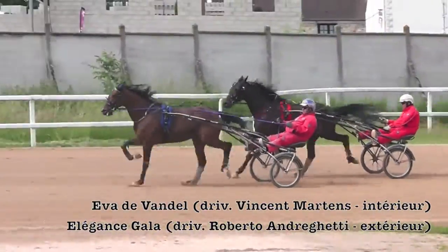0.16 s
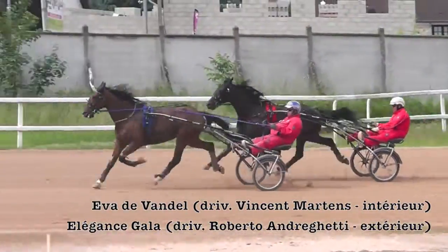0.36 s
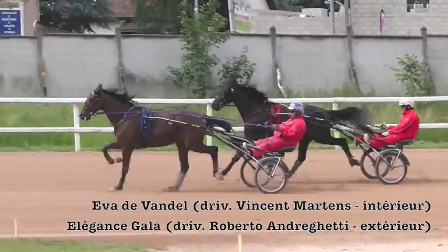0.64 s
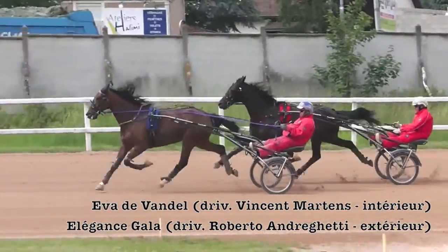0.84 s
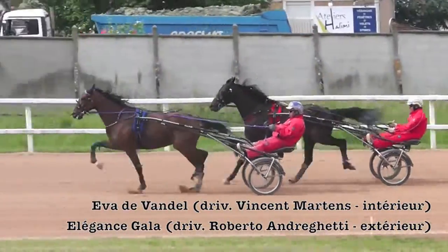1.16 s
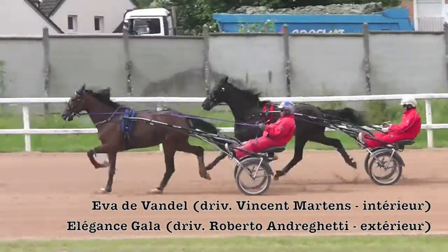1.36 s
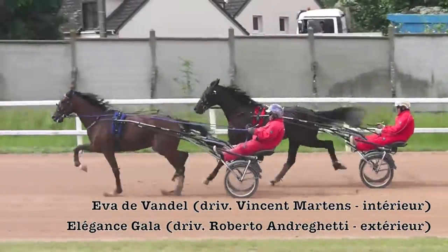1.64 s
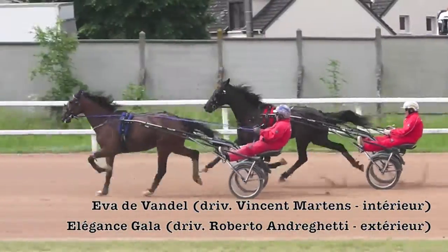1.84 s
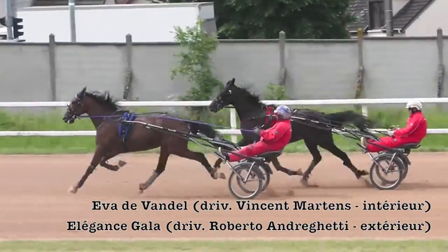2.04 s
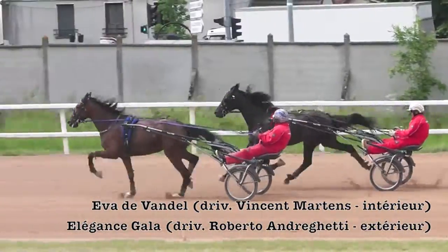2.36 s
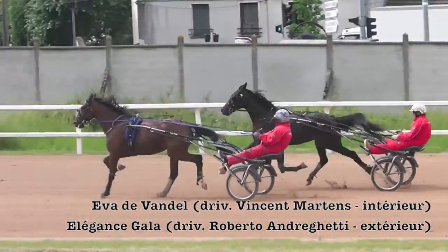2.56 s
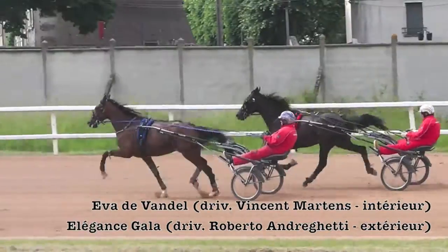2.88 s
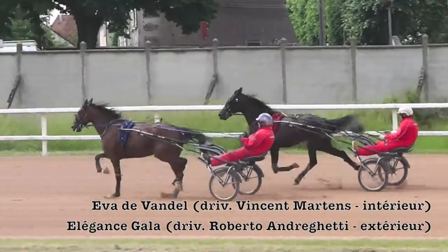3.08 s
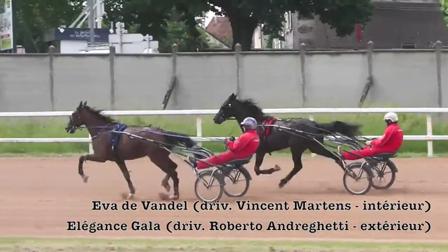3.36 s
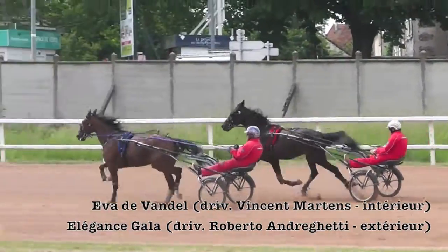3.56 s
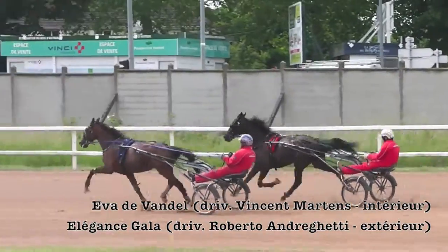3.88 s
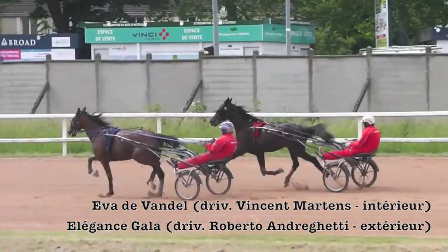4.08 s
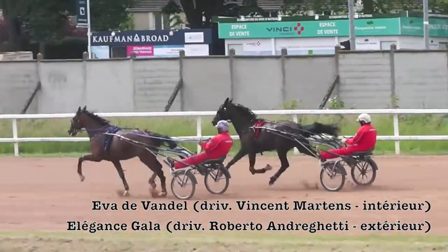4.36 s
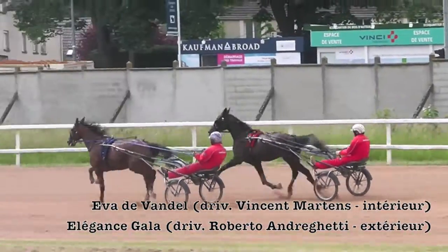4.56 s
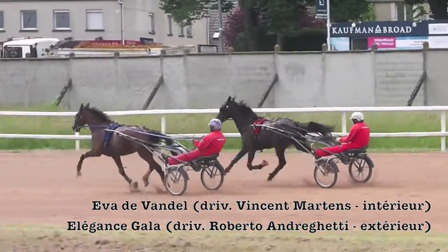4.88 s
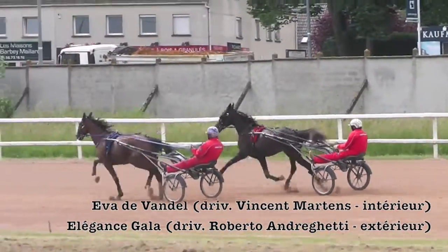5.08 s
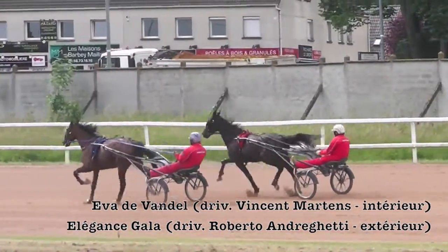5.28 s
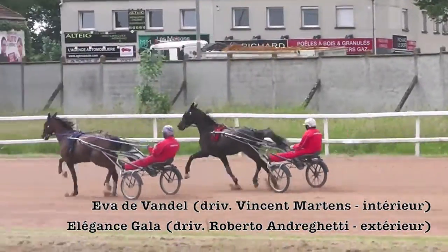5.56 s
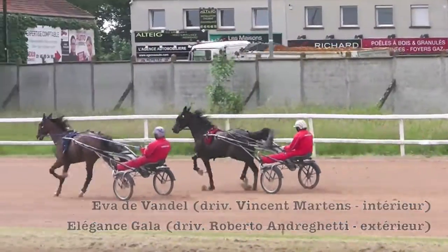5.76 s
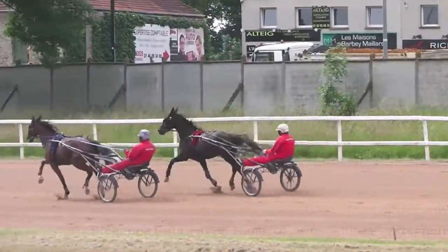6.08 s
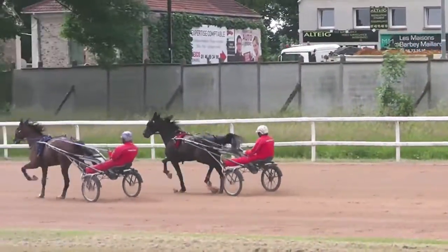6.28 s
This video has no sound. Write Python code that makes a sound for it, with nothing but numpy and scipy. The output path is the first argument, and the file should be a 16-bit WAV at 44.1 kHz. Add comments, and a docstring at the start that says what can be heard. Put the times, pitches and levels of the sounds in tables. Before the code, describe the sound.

Rapid thudding hooves on a sandy track with strap snaps and faint buckle clinks, low road roar behind, gusty microphone wind that finally drops.

```python
"""Two horses trot past on a sand track pulling light carts, then draw away: each hoof is a brief low swing
with a knock, a slap and a spray of sand made of shaped noise. Harness straps snap and grit ticks as bright
noise bursts, buckles tinkle as short wavering tones and cart wheels hiss. Traffic roars behind a wall as
patchy noise, two engines rev up in it as stacked sines, and low noise gusts buffet the microphone ports
until the wind drops."""
import sys
import numpy as np
from scipy import signal
from scipy.fft import rfft, irfft, next_fast_len
from scipy.io import wavfile
from scipy.ndimage import uniform_filter1d, map_coordinates

SR = 44100
rng = np.random.default_rng(int(sys.argv[2]) if len(sys.argv) > 2 else 0)


def dump_mix(stems):
    """Bounce the given channels to the path in sys.argv[1] as a 16-bit WAV at rate SR."""
    frames = np.atleast_2d(stems).T  # one column per channel
    limited = np.clip(frames, -1, 1)  # hard clip at full scale
    pcm = np.round(limited * 32767).astype(np.int16)
    wavfile.write(sys.argv[1], SR, pcm)


N = 283102

# road and track noise: (time [s], rumble level [dB], tyre roar level [dB], wheels in sand level [dB])
ROAD_LEVELS = [(0.0, -20, -31, -39), (1.77, -19, -27.5, -37), (2.13, -23, -31, -41), (3.0, -26, -36, -45.5),
               (3.6, -27.5, -36, -47), (5.51, -24.5, -32, -41.5), (6.42, -21.5, -30.5, -42.5)]
# colour of sand noise: (frequency [Hz], relative level [dB])
SAND_COLOUR = [(1500, -17), (2800, -5.5), (4000, 1.5), (6500, 2), (10000, 4.5), (11500, 1.5), (13000, -22),
               (15800, -35)]


def amp(db):
    """Decibels to linear gain."""
    return 10 ** (np.asarray(db) / 20)


def unit(x):
    """Scales a sound to rms 1."""
    return x / np.sqrt(np.mean(x ** 2) + 1e-20)


def along(points, hz):
    """Reads (Hz, value) points on a log frequency axis, held flat beyond both ends."""
    f, v = np.transpose(points)
    return np.interp(np.log(hz + 1), np.log(f + 1), v)


def curves(rows):
    """One value per sample for each column after the time."""
    s, *cols = np.transpose(rows)
    return [np.interp(np.arange(N) / SR, s, c) for c in cols]


def wobble(rate):
    """A smooth random curve around zero, rate knots a second."""
    knots = rng.standard_normal(int(N * rate / SR) + 4)
    return map_coordinates(knots, [np.arange(N) * rate / SR])


def filtered(x, response):
    """Multiplies the spectrum of x by a response of frequency."""
    m = next_fast_len(N + SR // 4)
    return irfft(rfft(x, m) * response(np.fft.rfftfreq(m, 1 / SR)), m)[..., :N]


def smooth_twice(x, size, axis=-1):
    """Two running averages in a row."""
    return uniform_filter1d(uniform_filter1d(x, size, axis), size, axis)


def rush(spectrum, patchy_db, grain_db=0):
    """Coloured noise of rms 1 with patches of random gain; grain_db adds a millisecond-scale gritty flutter."""
    white = rng.standard_normal(N) * amp(grain_db * wobble(900))
    z = signal.stft(white, nperseg=512)[2]
    # random gains, smoothed over both frequency and time
    field = smooth_twice(smooth_twice(rng.standard_normal(z.shape), 6, 0), 6, 1)
    patchy = signal.istft(z * amp(patchy_db * unit(field)), nperseg=512)[1][:N]
    return unit(filtered(patchy, lambda hz: amp(along(spectrum, hz))))


def add(track, s, sound):
    """Mixes a sound in from time s."""
    part = track[max(round(s * SR), 0):][:len(sound)]
    part += sound[:len(part)]


def road():
    """Far traffic in two layers, and the gritty hiss of cart wheels, dull at the top where the air absorbs it."""
    # low rumble and tyre roar: (frequency [Hz], relative level [dB])
    rumble_colour = [(15, -40), (30, 1.5), (70, 1), (130, -2.5), (200, -6.5), (380, -10), (520, -26),
                     (900, -70)]
    tyre_colour = [(250, -40), (520, -7), (780, 2), (1350, -3), (1700, -1.5), (2100, -12.5), (2350, -14),
                   (2700, -22.5), (4500, -30)]
    wheel_top_hz = 12300
    rumble_db, tyre_db, sand_db = curves(ROAD_LEVELS)
    rumble = amp(rumble_db) * rush(rumble_colour, patchy_db=1.5)
    tyres = amp(tyre_db + 0.72 * wobble(9.7)) * rush(tyre_colour, patchy_db=0.67)
    hiss = rush(SAND_COLOUR, patchy_db=1.5, grain_db=2.5)
    wheels = filtered(hiss, lambda hz: 1 / (1 + (hz / wheel_top_hz) ** 6))
    return rumble + tyres + amp(sand_db + 1.0 * wobble(14)) * wheels


def engines():
    """Low firing orders of passing engines, sines at multiples of a gliding base, a little unsteady."""
    # one list per engine: (time [s], base frequency [Hz], levels of multiples 2, 3 and 4 [dB])
    engine_runs = [
        [(0.45, 31.6, -29.5, -44, -28.5), (1.576, 36.62, -22.5, -29, -29), (2.2, 37.17, -23.5, -25.5, -39)],
        [(4.5, 37.3, -42, -24, -33), (4.616, 34.78, -25.5, -29.5, -34), (6.42, 38.07, -33.5, -41, -27.5)],
    ]
    out, t = np.zeros(N), np.arange(N) / SR
    for rows in engine_runs:
        start, end = rows[0][0], rows[-1][0]
        hz, *orders = curves(rows)
        turn = 2 * np.pi * np.cumsum(hz) / SR
        fade_in = np.clip((t - start) / 0.08, 0, 1)
        fade_out = np.clip((end + 0.056 - t) / 0.11, 0, 1)
        for k, db in enumerate(orders, 2):
            level = fade_in * fade_out * amp(db + 1.7 * wobble(9.4))
            out += level * np.sin(k * turn + 0.26 * wobble(6.5))
    return out


def wind():
    """Lumpy pressure, its own at each port, with deeper suction than push; each port leaks inverted into the other."""
    # gusts: (time [s], buffet level ahead of leak and port trim [dB])
    gust_levels = [(0.0, -17), (0.22, -25), (0.7, -16), (0.96, -31), (1.08, -16), (1.18, -29), (1.44, -26),
                   (1.84, -12), (2.12, -11), (2.18, -20), (2.28, -17), (2.34, -25), (2.78, -14),
                   (2.88, -22), (2.96, -13), (3.18, -22), (3.24, -12), (3.44, -20), (3.68, -12),
                   (3.76, -21), (3.84, -14), (4.14, -14), (4.36, -38), (4.64, -39), (4.72, -27),
                   (4.92, -46), (5.3, -48), (5.38, -36), (5.5, -50), (6.42, -50)]
    # colour of the buffeting: (frequency [Hz], relative level [dB])
    buffet_colour = [(8, -27), (16, -2), (43, 1), (88, 1), (154, -6), (292, -24), (550, -46), (1200, -70)]
    gust = np.array([unit(amp(0.94 * wobble(14)) * rush(buffet_colour, patchy_db=2.0)) for port in "LR"])
    suction = gust - 0.042 * gust ** 2
    gust = filtered(suction, lambda hz: hz ** 2 / (hz ** 2 + 12 ** 2))
    gust = gust - .47 * gust[::-1]
    port_trim = amp([[-1.3], [1.3]])  # left, right
    return amp(curves(gust_levels)[0]) * gust * port_trim


def snap(noise, db, hz, t60, rise):
    """A bright burst of noise, strongest round a centre, falling 60 dB in t60 seconds."""
    sand_share = .27  # a near snap keeps most of the top that flying sand lacks
    t, hz_axis = np.arange(len(noise)) / SR, np.fft.rfftfreq(len(noise), 1 / SR)
    bump = 0.9 + np.exp(-(np.log((hz_axis + 1) / hz) / 0.32) ** 2)
    low_cut = (hz_axis / 3000) ** 2 / (1 + (hz_axis / 3000) ** 2)
    colour = amp(sand_share * along(SAND_COLOUR, hz_axis)) * bump * low_cut
    envelope = amp(db - 60 * t / t60) * (1 - np.exp(-t / rise)) ** 2
    return envelope * unit(irfft(rfft(noise) * colour, len(t)))


def harness():
    """Straps snap, loose grit ticks at random in between, buckles ring briefly at one wavering pitch."""
    # harness straps and carts snapping: (time [s], level ahead of rise and decay [dB], centre [Hz])
    snaps = [(0.0692, -25, 6460), (0.193, -24, 8980), (0.231, -19.5, 10400), (0.2385, -18.5, 9500),
             (0.4853, -22, 7500), (0.5855, -25, 9540), (0.7133, -16.5, 9840), (0.836, -23.5, 10600),
             (0.966, -18.5, 12000), (1.072, -29, 6630), (1.1238, -25.5, 8850), (1.1418, -24.5, 6910),
             (1.2106, -22, 6650), (1.4353, -22, 9760), (1.5445, -21, 7240), (1.6726, -18, 10800),
             (1.731, -16, 9300), (1.749, -23, 6980), (1.78, -19.5, 7360), (1.8058, -25, 9870),
             (1.8771, -26, 9630), (1.931, -15.5, 9600), (2.0956, -24, 11000), (2.4174, -27, 10700),
             (2.5905, -27, 9790), (2.7751, -25, 10000), (3.0132, -30, 5190), (3.5867, -26.5, 9880),
             (3.703, -26, 5830), (4.0302, -25, 8210), (4.1272, -23, 3100), (4.5142, -25, 7900),
             (4.695, -24, 10800), (4.9177, -25.5, 8000), (5.1607, -23, 10200), (5.3717, -28.5, 8970),
             (5.7508, -24, 9450), (5.946, -28, 5700), (6.0372, -28, 6700)]
    # buckles and shaft fittings tinkling: (time [s], level ahead of rise and decay [dB], pitch [Hz])
    buckles = [(0.735, -33, 5684), (0.915, -28, 5650), (1.378, -24, 2320), (1.79, -31, 9900),
               (1.823, -29, 10034), (1.945, -35, 13100), (1.998, -28, 5620), (2.03, -24, 10100),
               (2.204, -33, 7950), (2.49, -33, 5140), (2.59, -27, 9819), (3.028, -32, 5167),
               (3.114, -35, 6700), (3.211, -34, 5211), (3.507, -24.5, 1614), (4.026, -28, 2300),
               (4.127, -38, 3190), (4.145, -30, 6240), (4.562, -29, 5250), (5.097, -31, 9900),
               (5.097, -31.5, 3980), (5.158, -30, 6600), (5.275, -34, 5070), (5.825, -39, 5300),
               (5.943, -36, 5650), (5.993, -36, 5300), (6.03, -29, 1650), (6.035, -26, 6800),
               (6.089, -32, 2880), (6.089, -26, 1710)]
    out, t = np.zeros(N), np.arange(SR // 8) / SR
    for (s, db, hz), noise in zip(snaps, rng.standard_normal((len(snaps), 2048))):
        add(out, s, snap(noise, db, hz, t60=0.029, rise=0.00096))

    grit_db, grit_spread_db = 1, 4  # smallest tick over the hiss of the wheels; rarer ticks are louder
    sand_db = curves(ROAD_LEVELS)[2]
    for when, size, pitch in rng.random(size=(420, 3)):
        level = sand_db[int(when * N)] + grit_db - grit_spread_db * np.log(size + 0.0044)
        noise = rng.standard_normal(size=1024)
        add(out, when * N / SR, snap(noise, level, hz=5000 + 8000 * pitch, rise=0.00054, t60=0.0094))

    for s, db, hz in buckles:
        envelope = amp(db - 60 * t / 0.069) * (1 - np.exp(-t / 0.0018)) ** 2
        # loose metal wavers in pitch: its phase wanders about 1.1 rad in 10 ms
        waver = 1.1 * np.cumsum(rng.standard_normal(size=len(t))) / np.sqrt(SR / 100)
        add(out, s, envelope * np.sin(2 * np.pi * hz * t + waver))
    return out


def hooves():
    """The ground gives under each hoof and springs back; the horn knocks, the sole slaps, sand flies."""
    # (time [s], thud level [dB], thud pitch [Hz], knock of the horn level [dB], slap level [dB],
    #  sand spray level [dB])
    hoof_falls = [(0.1203, -7.0, 434, -27, -28.0, -35), (0.1486, -11, 320, -16.5, -35, -43),
                  (0.361, -8.5, 275, -12, -30, -36.5), (0.3953, -6.0, 320, -20, -39.0, -35.5),
                  (0.4485, -12.5, 200, -36, -43, -41.0), (0.5903, -5, 318, -13, -24, -42.0),
                  (0.6083, -6.0, 320, -10.5, -34.0, -34), (0.6237, -10, 200, -33, -45.0, -50.0),
                  (0.634, -3.5, 327, -16, -28.0, -42.0), (0.843, -6.5, 378, -11.5, -28, -40),
                  (0.8733, -12, 231, -27, -28.5, -37.0), (0.889, -3.5, 278, -34, -31, -30.0),
                  (1.0736, -7, 337, -14.5, -23, -33), (1.0893, -4.5, 230, -18, -42, -39),
                  (1.1337, -7.5, 295, -25, -31, -36), (1.3222, -4.5, 253, -14.5, -26.5, -37),
                  (1.3875, -9.5, 230, -30, -29.5, -33), (1.554, -10.5, 396, -24, -23.5, -35),
                  (1.5616, -8, 367, -33, -33, -35.0), (1.6295, -3.5, 310, -31, -22, -30),
                  (1.807, -7, 368, -21, -27.5, -50.0), (1.868, -12, 230, -27, -30, -46),
                  (1.8819, -10, 270, -24, -29, -37.0), (1.9622, -11.5, 270, -28, -34.0, -50),
                  (2.0048, -14.5, 320, -32, -30, -36.5), (2.0402, -8.5, 278, -29, -24.5, -33.5),
                  (2.0533, -8.5, 200, -17, -27.5, -50.0), (2.1249, -13.5, 300, -28, -36, -40),
                  (2.2793, -13, 360, -28, -31.5, -49.0), (2.381, -17, 336, -38, -41, -41),
                  (2.5379, -10.5, 316, -36, -37, -38), (2.6214, -9, 262, -29, -32.0, -32.5),
                  (2.6609, -20, 270, -35, -46, -36.5), (2.7714, -12.5, 232, -30, -34, -39.5),
                  (2.871, -14.5, 253, -35, -34.5, -42.0), (2.8902, -15.5, 290, -27, -35.0, -39.5),
                  (3.0191, -18, 310, -27, -28.0, -38.0), (3.0254, -13.5, 300, -39, -45, -50),
                  (3.139, -15.5, 200, -36, -45.0, -39.5), (3.2572, -14, 200, -40, -45, -50),
                  (3.2671, -12, 200, -40, -44.0, -44.5), (3.3982, -16.5, 208, -38, -36, -40),
                  (3.485, -15.5, 200, -36, -45, -55), (3.5149, -13.5, 230, -39, -33, -40),
                  (3.6547, -11.5, 240, -36, -37, -44), (3.7588, -17, 368, -38, -32, -37.5),
                  (3.893, -16.5, 230, -30, -42.0, -54), (3.907, -15.0, 236, -31, -48.0, -38.0),
                  (4.0223, -17.5, 322, -26, -27.5, -39.0), (4.1562, -16.5, 222, -25, -40, -34),
                  (4.2694, -16, 386, -38, -35, -41), (4.4283, -15, 250, -31, -38, -37.5),
                  (4.5325, -15.5, 315, -28, -29.5, -37.5), (4.6699, -19.5, 220, -36, -42.0, -39.0),
                  (4.7798, -16.5, 232, -30, -46.0, -39.5), (4.9436, -18.0, 219, -26, -30.5, -41),
                  (5.0295, -19, 290, -26, -31.5, -56), (5.0463, -15.0, 330, -31, -43, -41),
                  (5.1979, -13.0, 205, -38, -51.0, -38.5), (5.2722, -16.0, 318, -23, -34, -49),
                  (5.462, -14.5, 199, -36, -39.0, -37.0), (5.5409, -14.5, 300, -22, -30.5, -48),
                  (5.7156, -14.0, 250, -27, -37, -39.5), (5.791, -13.5, 200, -33, -28.5, -41.0),
                  (5.985, -13.5, 210, -35, -35, -35), (6.033, -14.5, 300, -25, -26, -40),
                  (6.0958, -23.0, 200, -34, -28, -38), (6.2459, -10.5, 230, -24, -52.0, -42),
                  (6.2889, -15, 280, -19.5, -40, -41), (6.3447, -18.5, 230, -34, -47.0, -48.0)]
    # colour of the slap: (frequency [Hz], relative level [dB])
    slap_colour = [(400, -12), (900, -3), (1700, 6), (2400, -9), (3300, -22.5)]
    thud, slap_power, spray_power = np.zeros((3, N))
    lead = .02  # s of sound ahead of the listed time
    t = np.arange(SR // 8) / SR - lead
    noises = rng.standard_normal((len(hoof_falls), len(t)))
    for (s, db, hz, knock_db, slap_db, spray_db), noise in zip(hoof_falls, noises):
        cycles = t * hz
        swing_envelope = np.exp(-(cycles / np.where(cycles < 0, .5, .95)) ** 2)
        swing = -np.cos(2 * np.pi * cycles + 0.37) * swing_envelope
        knock = -np.cos(2 * np.pi * 740 * t) * np.exp(-(t / 0.0018) ** 2)
        shake = unit(smooth_twice(noise, 45)) * np.exp(-((t - .006) / 0.013) ** 2)
        add(thud, s - lead, amp(db) * (swing + amp(-17.0) * shake) + amp(knock_db) * knock)
        # overlapping slaps and sprays add as power, hence the doubled dB
        slap_envelope = np.exp(-((t + 0.002) / np.where(t < -.002, .003, .008)) ** 2)
        add(slap_power, s - lead, amp(2 * slap_db) * slap_envelope)
        spray_envelope = np.exp(-np.abs(t + 0.011) / np.where(t < -.008, .006, .018))
        add(spray_power, s - lead, amp(2 * spray_db) * spray_envelope)
    slap = np.sqrt(slap_power) * rush(slap_colour, patchy_db=2.0)
    spray = np.sqrt(spray_power) * rush(SAND_COLOUR, patchy_db=2.0, grain_db=1.0)
    return thud + slap + spray


def ports(x):
    """A frontal sound: nearly alike at both ports, with a scattered part of random phase that grows at the top."""
    # width at the two ports: (frequency [Hz], side under mid [dB])
    width = [(100, -29), (700, -18.5), (1300, -15.5), (2400, -27.5), (5000, -32), (9000, -50), (10500, -10),
             (12500, -0.5), (15000, -14)]
    # balance: (frequency [Hz], left over right [dB])
    lean = [(150, -1.5), (950, -1.15), (2400, -0.5), (7500, 0.0), (10000, -1.5), (15000, -3)]
    # the left port leads at the very top: (frequency [Hz], phase [rad])
    phase_lead = [(11600, 0.0), (12600, 1.1), (13100, 1.1), (14000, 0.49)]
    z = signal.stft(x, nperseg=256)[2]
    random_phase = np.exp(2j * np.pi * rng.random(size=z.shape))
    scattered = signal.istft(z * random_phase, nperseg=256)[1][:N]
    side = filtered(scattered, lambda hz: amp(along(width, hz)))

    def port_response(hz):
        """Half of the lean and lead goes to each port, with opposite signs."""
        gain = amp(np.outer([.5, -.5], along(lean, hz)))
        return gain * np.exp(.5j * np.outer([1, -1], along(phase_lead, hz)))

    return filtered(np.array([x + side, x - side]), port_response)


def scene():
    """Track and road arrive from the front, losing treble over time; the wind acts on the ports themselves."""
    track = road() + harness() + hooves()
    dulled = filtered(track, lambda hz: 1 / (1 + (hz / 13500) ** 6))
    far = np.clip(np.arange(N) / N * 0.92, 0, 1)  # the air takes more of the top as the horses draw away
    return ports((1 - far) * track + far * dulled + engines()) + wind()


def record(dry):
    """Peaks are squeezed smoothly under full scale; then everything above the band limit is removed."""
    top_hz = 15843
    held = dry / (1 + np.abs(dry / 1.0) ** 5) ** (1 / 5)
    return filtered(held, lambda hz: hz < top_hz)


dry = scene()
out = record(dry)
dump_mix(out)
```